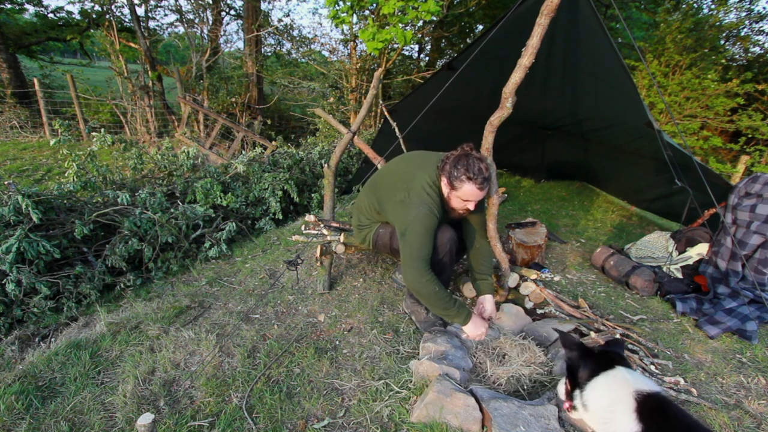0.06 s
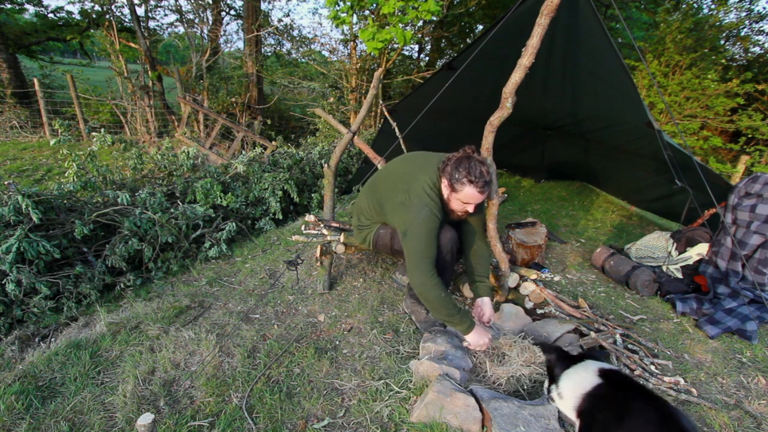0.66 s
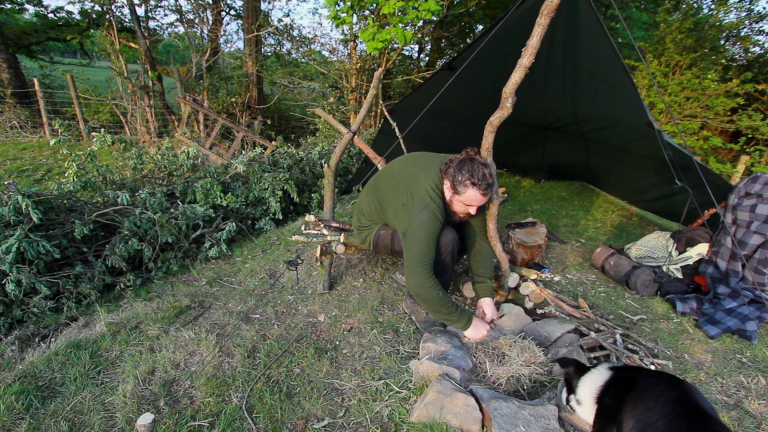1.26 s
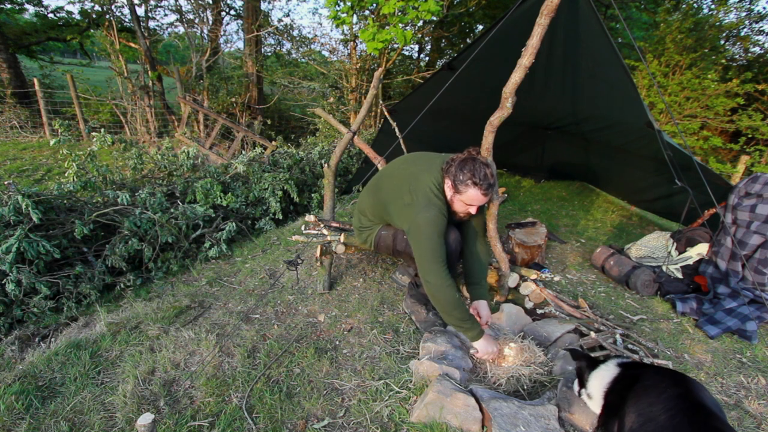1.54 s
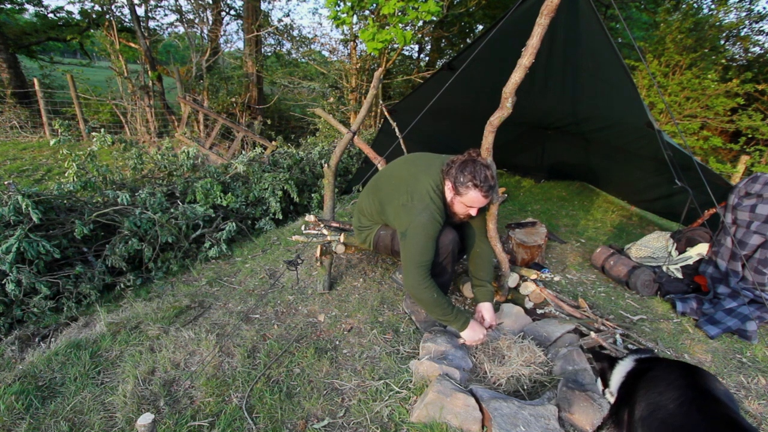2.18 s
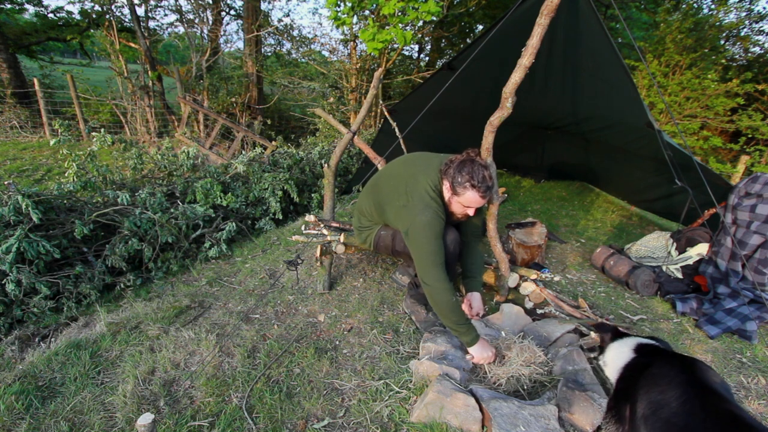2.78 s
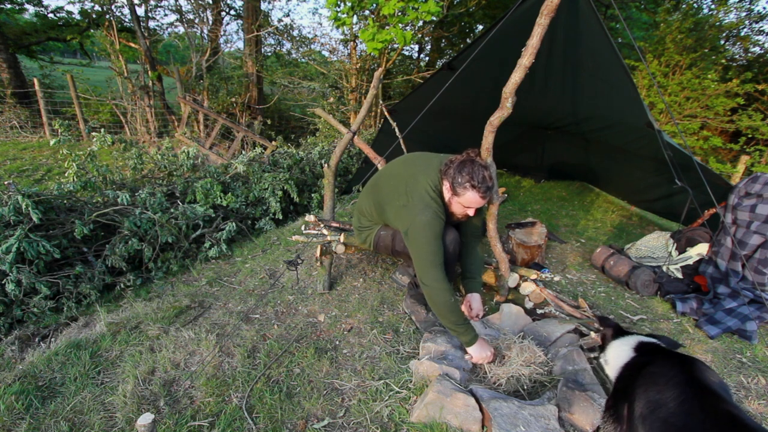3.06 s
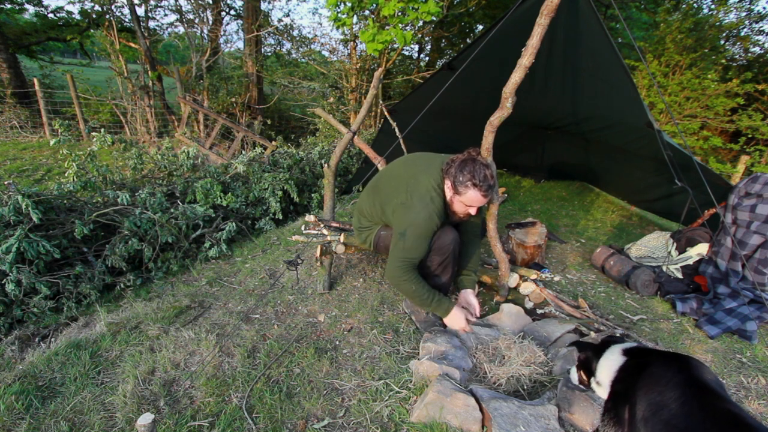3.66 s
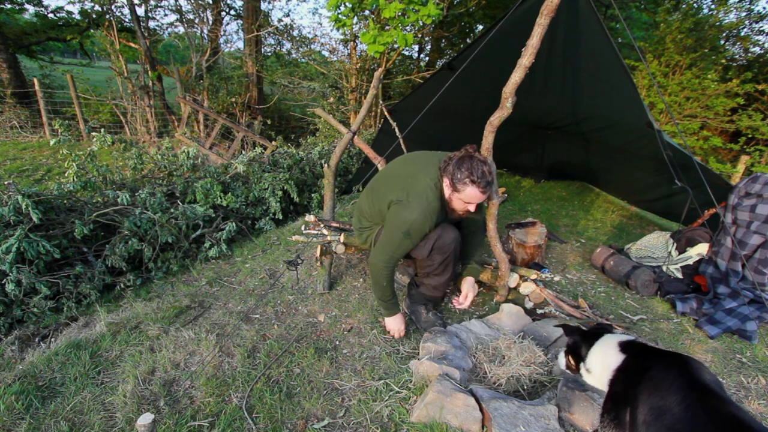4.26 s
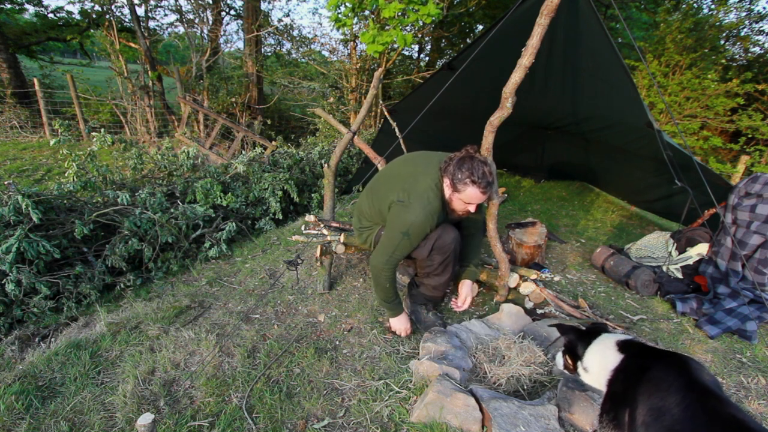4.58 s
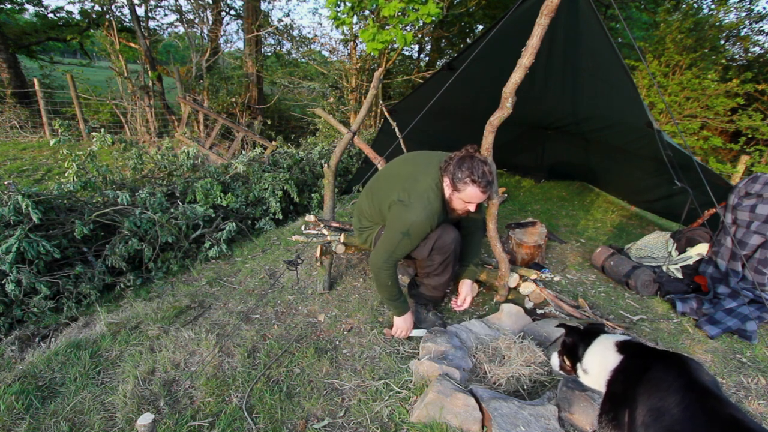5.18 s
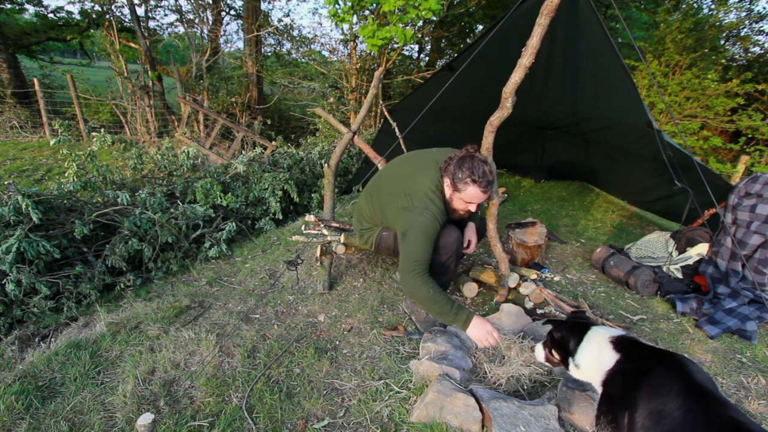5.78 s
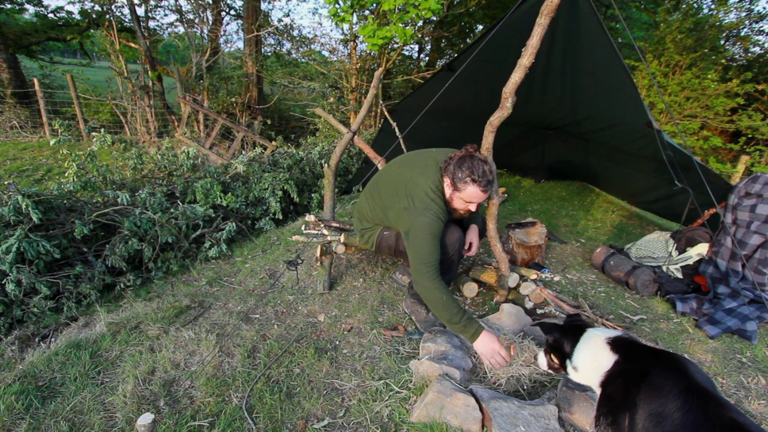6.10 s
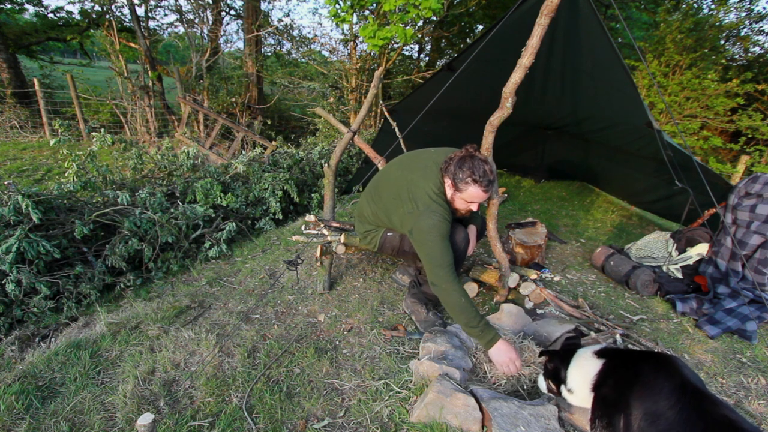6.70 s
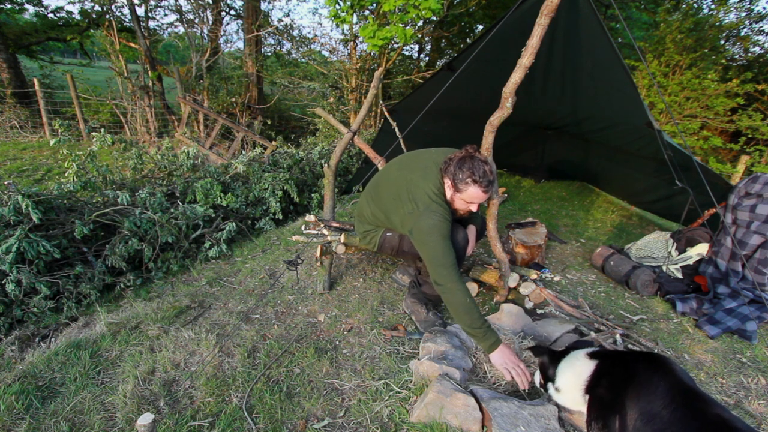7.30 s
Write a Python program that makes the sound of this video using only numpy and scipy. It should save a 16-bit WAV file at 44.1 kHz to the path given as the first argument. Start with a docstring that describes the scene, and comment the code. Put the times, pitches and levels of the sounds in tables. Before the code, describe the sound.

A close metallic click leads into three quick, chattering scrapes of a fire steel, each throwing sparks that crackle and die away over tinder. Small clicks of steel fall between the strokes. The second half is much quieter: a slight dry rustle, two dull knocks on the ground, a light clink of tools and a few tiny stalk snaps. Faint birdsong with a slight woodland echo and a low, distant rush continue throughout.

```python
"""A click and a short rasp: a scraper touches a fire steel and chatters down the rod, outdoors.
It strikes three times over a nest of tinder. Each time the edge sticks and slips, tearing off shavings
that flare as sparks and fizz out. Then the dry tinder rustles and the tools are put down with a clink.
Songbirds whistle and twitter in the echoing trees, over a soft, distant rush."""
import sys
import numpy as np
from scipy import signal
from scipy.fft import rfft, irfft, next_fast_len
from scipy.io import wavfile
from scipy.ndimage import map_coordinates

SR = 44100
rng = np.random.default_rng(int(sys.argv[2]) if len(sys.argv) > 2 else 0)


def dump(signal):
    """Clip the signal to [-1, 1] and save it as 16-bit WAV at the path in sys.argv[1]."""
    limited = np.clip(np.atleast_2d(signal).T, -1, 1)
    pcm = np.round(limited * 32767).astype(np.int16)
    wavfile.write(sys.argv[1], SR, pcm)


N = 328545

# Strokes of the scraper. Each row: time of the bite in seconds, level in dB, length as a factor,
# added hiss in dB, chatter in dB, tuning of the tool as a factor.
STROKES = [(0.4717, -16, 0.99, -9, -2, .97), (1.5207, -14.0, 0.93, -8, -5, 1),
           (2.5655, -13.5, 0.822, -6.5, -4.5, 1.03)]
# Tone colours of the grit: a rasp and a high hiss. Each row: frequency in Hz, relative level in dB.
RASP_COLOUR = [(500, -68), (1000, -29), (1600, -6), (2400, 2.5), (3200, -9), (3900, -8), (5000, -21.5),
               (7000, -57)]
HISS_COLOUR = [(3500, -14), (5000, 4.5), (6600, -6), (7600, 7.5), (9200, -3.5), (11400, 3.5), (12500, -9),
               (15700, -17)]
# Resonances of the tool while the edge presses on. Each row: frequency in Hz, boost in dB.
TOOL_RESONANCES = [(1170, 7), (1385, 10.5), (1580, 7.5), (1855, 10), (2290, 7), (2780, 8.5), (3080, 5.5),
                   (3800, 6)]
# Showers of sparks, one per stroke. Each row: time of full blaze in seconds, fizz in dB, fading in dB
# per second, life in seconds, puff in dB, half the puff's length in seconds.
SHOWERS = [(0.531, -35.5, 116, 0.35, -53.5, 0.032), (1.564, -32.5, 93, 0.21, -44.5, 0.044),
           (2.608, -33, 143, 0.36, -45, 0.029)]
# Stray shavings that flare late. Each row: peak time in seconds, fizz in dB, half length in seconds.
FLARES = [(0.603, -45, 0.012), (0.722, -52.5, 0.019), (1.68, -48, 0.0074), (1.761, -57, 0.0055),
          (2.633, -39.5, 0.011), (2.741, -52, 0.034), (2.854, -47.5, 0.036)]
# Tone colours of the sparks' fizz and low puff. Each row: frequency in Hz, relative level in dB.
FIZZ_COLOUR = [(240, -15.5), (400, -8), (862, -11.5), (1500, -10), (2100, -3), (3380, -1), (5690, -13.5),
               (10200, -12.5), (15700, -24)]
PUFF_COLOUR = [(60, -37), (120, 8.5), (210, -11), (320, -2), (480, -8), (900, -23), (3000, -64)]
# The scraper touches the rod. Each row: start in seconds, level in dB, treble change in dB.
TOUCHES = [(0.191, -10.5, -1), (0.1983, -17.5, -5), (0.235, -25.5, -3), (0.884, -29, -6), (0.916, -27, -5),
           (0.931, -26.5, 8), (0.9391, -32, 8), (0.943, -26, 1), (1.0313, -31, 13), (1.0547, -33, 12),
           (1.0898, -33, 14), (1.109, -35, 7), (1.2102, -21.5, -1), (1.2156, -24.5, -6), (1.852, -35.5, 7),
           (2.118, -34, -1), (2.138, -27.5, -1), (2.152, -26.5, -4), (2.162, -26.5, 0), (2.227, -33.5, -5)]
# The ring of hand-held steel. Each row: frequency in Hz, level in dB, seconds to fade by 60 dB (t60).
ROD_TONES = [(2383, -3, 0.053), (2750, -19, 0.036), (3890, -22, 0.034), (4400, -12.5, 0.016),
             (6030, -34, 0.035), (8640, -47, 0.02)]
# The tools are put down. Each row: start in seconds, level in dB, pitch in Hz, t60 in seconds.
CLINKS = [(5.284, -35, 2412, 0.18), (5.283, -48.5, 1300, 0.4), (5.333, -33, 1390, 0.1),
          (5.354, -48.5, 3980, 0.058), (5.354, -57, 9390, 0.081)]
# Dry stalks snap and sparks pop. Each row: start in seconds, level in dB.
SNAPS = [(0.721, -47), (1.598, -28), (2.736, -39), (3.889, -46.5), (3.977, -54), (5.3527, -50),
         (5.745, -50), (5.769, -45), (6.622, -52)]
# Dull knocks on the ground. Each row: peak time in seconds, level in dB, pitch in Hz,
# half length in seconds, added dry scuff in dB.
KNOCKS = [(3.98, -50.5, 392, 0.012, 1), (5.115, -43, 150.2, 0.012, -40)]
# Slurred bird whistles. Each row: start and length in seconds, middle pitch in Hz,
# glide as a share of the pitch, level in dB.
WHISTLES = [(0.699, 0.3, 2430, -0.019, -60.5), (1.412, 0.12, 3430, .07, -61),
            (2.17, 0.052, 3480, -0.034, -52.5), (2.88, 0.16, 2830, -0.01, -57.5),
            (3.097, .13, 3124, 0.017, -60), (3.628, 0.084, 3520, 0.034, -57.5),
            (4.08, 0.035, 3050, 0.24, -58), (4.103, 0.057, 4120, -0.067, -55), (4.35, .13, 5650, -.02, -73),
            (4.418, 0.33, 2827, .08, -62), (6.075, 0.13, 2327, 0.038, -59.5)]
# Twittered phrases. Each row: start and length in seconds, first and last pitch in Hz, level in dB.
PHRASES = [(0.091, .33, 2870, 2675, -60), (0.807, 0.29, 4015, 3720, -54.5), (1.65, 0.17, 3180, 3040, -49),
           (1.786, 0.39, 4860, 4670, -64), (1.855, 0.14, 3435, 3600, -49), (1.97, 0.087, 3430, 2710, -51.5),
           (2.275, 0.26, 2780, 2497, -58), (2.928, 0.069, 3430, 3094, -49.5),
           (3.196, 0.14, 2964, 2950, -51), (6.43, 0.13, 2190, 2020, -57), (6.647, 0.175, 2175, 2130, -55),
           (6.971, .47, 2523, 2570, -58)]
# A repeated call, a dip then a buzz. Each row: start in seconds, level in dB, lowest pitch in Hz.
CALLS = [(4.809, -59, 2380), (5.204, -57, 2562), (5.604, -55.5, 2508), (5.954, -56.5, 2445),
         (6.348, -61, 2364), (6.795, -58, 2480), (7.316, -57.5, 2700)]
# The echo of the trees. Each row: frequency in Hz, t60 in seconds.
TREE_ECHO = [(3000, 0.48), (12000, 0.19)]
# Tone colours of the distant rumble and rush. Each row: frequency in Hz, relative level in dB.
RUMBLE_COLOUR = [(18, -29), (64, 1.5), (118, -1), (141, -10.5), (177, 0), (200, -24.5), (260, -66),
                 (440, -120)]
RUSH_COLOUR = [(190, -30.5), (260, -24), (305, -5.5), (345, -11.5), (480, -7.5), (780, 1), (1600, -8),
               (2300, -18.5), (3500, -19), (5500, -43), (15000, -55.5)]

TOP_HZ = 15800
# These times and rates suit a stroke of length 1; each stroke stretches them by its own length.
# The hand speeds up once in each stroke, and the chatter climbs with it.
SLOW_HZ, FAST_HZ, SPEED_UP_AT_S, SPEED_UP_S = 705.4, 1332.6, 0.00743, 0.00339
# The edge digs in, holds, then runs free: the grit fades first, the chatter rings on a little louder.
BITE_DB_PER_S, RASP_HOLD_S, RASP_FALL_DB_PER_S = 2302, 0.01, 1301
CHATTER_LEAD_S, CHATTER_HOLD_S, CHATTER_FALL_DB_PER_S, RUN_FREE_DB = 0.00087, 0.018, 2994, 6.5


def scrapes(jitter=0.0976, overtone_db=-8, rough_db=-2.5, grit_db=2.85, slide_db_per_s=430.5):
    """The edge sticks and slips on the rod, faster as the stroke speeds up, and tears off grit."""
    out, t = np.zeros(N), np.arange(-SR // 16, SR // 16) / SR
    n = len(t)
    light_slide = amp(-23 - slide_db_per_s * np.abs(t))
    for s, db, length, hiss_db, chatter_db, tuning in STROKES:
        age = t / length
        speed = 1 / (1 + np.exp((SPEED_UP_AT_S - age) / SPEED_UP_S))
        pitch = SLOW_HZ + (FAST_HZ - SLOW_HZ) * speed
        phase = 2 * np.pi * np.cumsum(pitch * (1 + jitter * wobble(906, n))) / SR
        chatter = envelope(age + CHATTER_LEAD_S, BITE_DB_PER_S, CHATTER_HOLD_S, CHATTER_FALL_DB_PER_S)
        chatter *= np.sin(phase) * amp(chatter_db + RUN_FREE_DB * speed + rough_db * wobble(353.6, n))
        bite = np.maximum(envelope(age, BITE_DB_PER_S, RASP_HOLD_S, RASP_FALL_DB_PER_S), light_slide)
        # While the edge bites, each slip is abrupt: it makes overtones and a burst of grit.
        overtones = sum(amp(overtone_db * k / 2) * np.sin(k * phase + rng.uniform(0, 2 * np.pi))
                        for k in range(2, 5))
        bursts = (1 + 0.75 * np.cos(phase)) * amp(grit_db * wobble(496.5, n))
        grit = unit(bursts) * (noise(RASP_COLOUR, n) + amp(hiss_db) * noise(HISS_COLOUR, n))
        stroke = tool_body(chatter + bite * (grit + overtones), tuning)
        add(out, s + t[0], amp(db) * stroke * signal.windows.tukey(n, .2))
    return out


def tool_body(x, tuning, width_hz=90):
    """So small a tool gives little bass; its resonances shift with the grip and sound hollow."""
    def gain(hz):
        boost_db = sum(db * np.exp(-((hz - tuning * centre) / width_hz) ** 2)
                       for centre, db in TOOL_RESONANCES)
        return amp(along([(380, -17), (700, 0), (930, 0.5), (1030, -4.5)], hz) + boost_db)
    return filtered(x, gain)


def sparks(catch_db_per_s=167, blaze_s=0.0098, die_db_per_s=201, puff_lag_s=0.032):
    """Burning shavings catch, crackle and thin out, dulling as they cool; their heat makes a low puff."""
    burning = sum(amp(db) * swell(s, half) for s, db, half in FLARES)
    heat, t = np.zeros(N), np.arange(N) / SR
    for (bite_s, *_), (s, db, fade_db_per_s, life, puff_db, half) in zip(STROKES, SHOWERS):
        alight = (t > bite_s) * amp(-die_db_per_s * np.maximum(t - s - life, 0))
        burning += amp(db) * envelope(t - s, catch_db_per_s, blaze_s, fade_db_per_s) * alight
        heat += amp(puff_db) * swell(s + puff_lag_s, half)
    crackle = noise(FIZZ_COLOUR, N, spiky_db=5.5)
    fizz = unit(crackle * amp(2 * wobble(260, N) + wobble(60, N)))  # quick sputters, slower surges
    treble = filtered(fizz, lambda hz: np.minimum(hz / TOP_HZ, 1))
    cooled = 1 - (burning / burning.max()) ** 0.23
    return burning * (fizz - cooled * treble) + heat * noise(PUFF_COLOUR, N)


def touches(ring_db=-4, crack_db=-6.5, crack_t60=0.012, rub_db=-24, rub_t60=0.13, attack_s=0.0006):
    """Each touch rings the hand-damped steel and slides a little; some light taps are thin and bright."""
    out, t = np.zeros(N), np.arange(SR // 8) / SR
    colour = [(500, -27), (1300, 2), (2700, 9), (5500, -20.5), (11000, -27), (14000, -39)]
    for s, db, treble_db in TOUCHES:
        ring = sum(amp(level + rng.normal(0, 0.32) - 60 * t / t60)
                   * np.sin(2 * np.pi * hz * (1 + rng.normal(0, 0.0064)) * t)
                   for hz, level, t60 in ROD_TONES)
        contact = amp(crack_db - 60 * t / crack_t60) + amp(rub_db - 60 * t / rub_t60)
        crack = contact * noise(colour, len(t), spiky_db=4.5)
        hit = (amp(ring_db) * ring + crack) * (1 - np.exp(-t / attack_s))
        hit = np.pad(hit, (SR // 500, 0))  # room for the filter to spread the click
        hit = filtered(hit, lambda hz: amp(along([(3000, 0.0044), (4400, treble_db)], hz)))
        add(out, s - 1 / 500, amp(db) * hit)
    return out


def clinks(attack_s=0.00045, tick_db=-12, tick_t60=0.13):
    """Steel ticks and rings as it is put down."""
    out, t = np.zeros(N), np.arange(SR // 4) / SR
    colour = [(600, -6), (1500, 3), (3800, -9), (7000, -29)]
    for s, db, hz, t60 in CLINKS:
        ring = amp(-60 * t / t60) * np.sin(2 * np.pi * hz * t + 0.36 * wobble(110, len(t)))
        tick = amp(tick_db - 60 * t / tick_t60) * noise(colour, len(t))
        add(out, s, amp(db) * (ring + tick) * (1 - np.exp(-t / attack_s)))
    return out


def snaps(t60=0.007):
    """Stalks snap and sparks pop, each a tiny burst of bright noise."""
    out, t = np.zeros(N), np.arange(SR // 4) / SR
    colour = [(1000, -6), (3300, 3), (6000, -3), (15000, -9)]
    for s, db in SNAPS:
        add(out, s, amp(db - 60 * t / t60) * noise(colour, len(t), spiky_db=2))
    return out


def ground(rustle_at_s=3.8, rustle_half_s=0.41, rustle_db=-65):
    """The ground takes two dull knocks, and dry grass rustles as the person shifts their weight."""
    out, t = np.zeros(N), np.arange(N) / SR
    scuff = noise([(1500, -24), (3300, 2), (4700, -7.5), (6500, -27), (15000, -33)], N, spiky_db=9)
    for s, db, hz, half, scuff_db in KNOCKS:
        thud = np.sin(2 * np.pi * hz * t + .5 * wobble(hz / 2, N))
        out += amp(db) * swell(s, half) * (thud + amp(scuff_db) * scuff)
    rustle = unit(scuff * amp(1.9 * wobble(76, N)))
    return out + amp(rustle_db) * swell(rustle_at_s, rustle_half_s) * rustle


def birds(arch=0.038, dip_db=1, buzz_db=2.5):
    """Three kinds of song: arching whistles, twittered phrases, and a repeated dip and buzz."""
    out = np.zeros(N)
    for s, length, hz, glide, db in WHISTLES:
        pitches = hz * np.array([1 - arch - glide / 2, 1, 1 - arch + glide / 2])
        add(out, s, amp(db) * whistle(length, pitches, warble=0.0043, flutter_db=1.1))
    for s, length, first_hz, last_hz, db in PHRASES:
        add(out, s, amp(db) * twitter(length, first_hz, last_hz))
    for s, db, hz in CALLS:
        dip = whistle(0.078, hz * np.array([1.19, 1, 1.19]), warble=0.0099, flutter_db=3.5)
        buzz = whistle(0.11, hz * np.array([1.11, 1.22, 1.28]), warble=0.0645, flutter_db=-5.5)
        add(out, s, amp(db + dip_db) * dip)
        add(out, s + 0.063, amp(db + buzz_db) * buzz)
    return out


def whistle(length, pitches, warble, flutter_db=5):
    """One note gliding through three pitches; strong, fast warbling turns it into a buzz."""
    n = int(length * SR)
    glide = np.polyval(np.polyfit([0, .5, 1], pitches, 2), np.linspace(0, 1, n))
    hz = glide * (1 + warble * wobble(485, SR // 2)[:n])
    flutter = amp(flutter_db * wobble(46.7, SR // 2)[:n])
    return np.sin(2 * np.pi * np.cumsum(hz) / SR) * signal.windows.tukey(n, .35) * flutter


def twitter(length, first_hz, last_hz, notes_per_s=32, warble=0.025, uneven_db=2.5):
    """A quick run of notes, each a little off the gliding pitch and slurred up or down."""
    n = int(length * SR)
    note, progress = np.divmod(np.arange(n) / SR * notes_per_s, 1)
    step, slur, accent = rng.standard_normal((64, 3))[note.astype(int)].T
    bend = 0.0201 * step + 0.063 * slur * (progress - .5) + warble * wobble(484, SR)[:n]
    hz = np.linspace(first_hz, last_hz, n) * (1 + bend)
    loudness = np.sin(np.pi * progress) * amp(uneven_db * accent) * signal.windows.tukey(n, .2)
    return np.sin(2 * np.pi * np.cumsum(hz) / SR) * loudness


def far_birds(count=190, level_db=-65.5, base_hz=3050, treble_db=-13, busy_s=3.3):
    """Far birds merge into a faint warbling, busiest at first; distance dulls their high notes."""
    out = np.zeros(N)
    for when, size, buzz, high, bend, slope in rng.random((count, 6)):
        hz = base_hz * 1.4 ** (high ** 2 * 2 - .5)
        pitches = hz * 1.3 ** np.array([1 - 2 * slope, 2 * bend - 1, 2 * slope - 1])
        s = rng.uniform(0, busy_s if when < .55 else (N - 1) / SR)
        note = whistle(0.0229 + 0.089 * size ** 2, pitches, warble=0.065 * buzz)
        add(out, s, amp(level_db + treble_db * high ** 2) * note)
    return out


def trees(x):
    """The trees scatter a sound into echoes, whose high notes die first."""
    hz, t, spectrum = signal.stft(rng.standard_normal(SR // 2), SR, nperseg=256)
    fade = amp(-60 * t / along(TREE_ECHO, hz)[:, None])
    tail = signal.istft(spectrum * fade, SR, nperseg=256)[1]
    delayed = np.pad(x, (SR // 100, 0))
    return signal.fftconvolve(delayed, tail / np.linalg.norm(tail))[:N]


def air(rumble_db=-62, rush_db=-55.5, hiss_db=-68.5):
    """A low rumble, a far rush that swells slowly, and a faint even hiss."""
    rumble = amp(rumble_db + 0.64 * wobble(4.4, N)) * noise(RUMBLE_COLOUR, N)
    rush = amp(rush_db + 0.58 * wobble(3.15, N)) * noise(RUSH_COLOUR, N)
    return rumble + rush + amp(hiss_db) * noise([(300, -35), (2000, 0), (15500, -4)], N)


def amp(db):
    """Turn decibels into a gain to multiply by."""
    return 10 ** (np.asarray(db) / 20)


def unit(x):
    """Scale a sound to an average power of 1."""
    return x / np.sqrt(np.mean(x ** 2) + 1e-20)


def along(points, hz):
    """Read between (Hz, value) points, with octaves evenly spaced."""
    point_hz, values = np.transpose(points)
    return np.interp(np.log(hz + 1), np.log(point_hz + 1), values)


def wobble(rate, size):
    """A smooth curve through `rate` random values a second."""
    return map_coordinates(rng.standard_normal(size + 4), [np.arange(size) * rate / SR])


def filtered(x, response):
    """Scale each frequency in x by the gain response(hz)."""
    n = x.shape[-1]
    padded = next_fast_len(n + 8192)
    return irfft(rfft(x, padded) * response(np.fft.rfftfreq(padded, 1 / SR)), padded)[..., :n]


def noise(colour, size, spiky_db=0):
    """Noise with a tone colour; spiky_db makes its tiny impulses uneven, so it crackles."""
    impulses = rng.standard_normal(size) * amp(spiky_db * rng.standard_normal(size))
    return unit(filtered(impulses, lambda hz: amp(along(colour, hz))))


def add(track, s, x):
    """Mix x into the track, starting at s seconds."""
    i = max(round(s * SR), 0)
    track[i:i + len(x)] += x[:len(track[i:])]


def swell(s, half):
    """A bell-shaped rise and fall around s seconds."""
    return np.exp(-((np.arange(N) / SR - s) / half) ** 2)


def envelope(t, rise_db_per_s, hold_s, fall_db_per_s):
    """A gain that rises to 1 at t = 0, holds, then dies away."""
    return amp(rise_db_per_s * np.minimum(t, 0) - fall_db_per_s * np.maximum(t - hold_s, 0))


def scene():
    """Everything is heard from the centre, with a faint noise for stereo width."""
    fire_making = scrapes() + sparks() + touches() + clinks() + snaps() + ground()
    song = birds() + far_birds()
    echo = trees(amp(-28.5) * fire_making + amp(-4) * song)
    mid = fire_making + song + echo + air()
    side = amp(-69) * noise([(200, 12), (500, -4.5), (4000, 10)], N)
    return np.array([mid + side, mid - side])


def record(dry):
    """Cut away the highest treble, above TOP_HZ."""
    return filtered(dry, lambda hz: hz < TOP_HZ)


dry = scene()
out = record(dry)
dump(out)
```